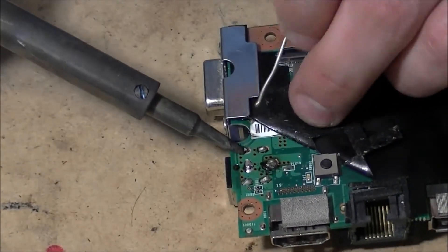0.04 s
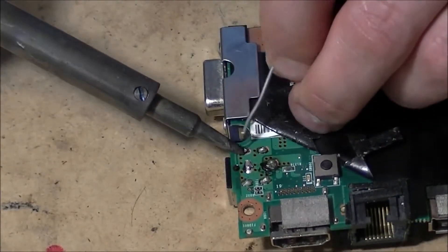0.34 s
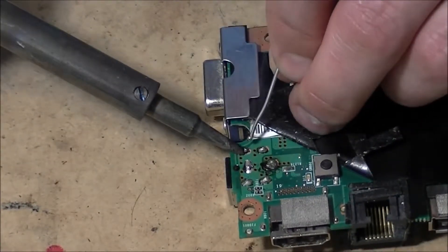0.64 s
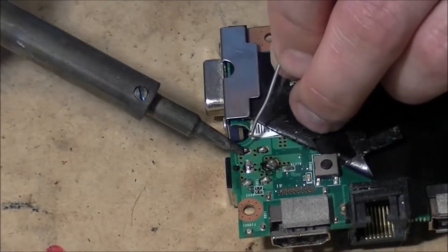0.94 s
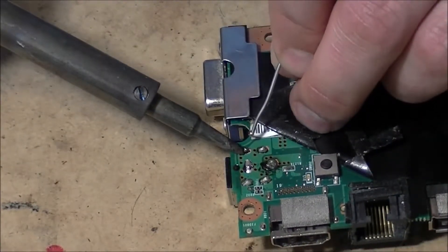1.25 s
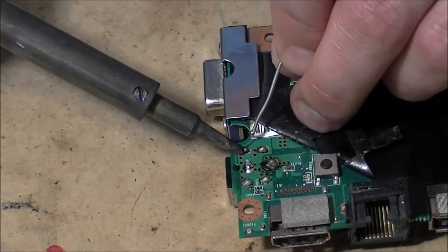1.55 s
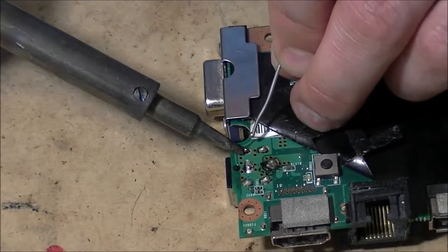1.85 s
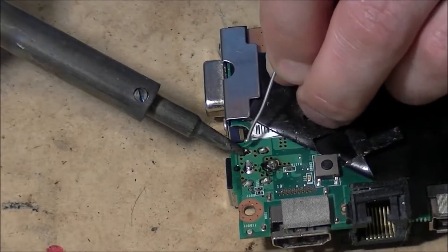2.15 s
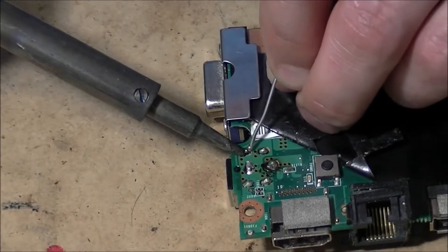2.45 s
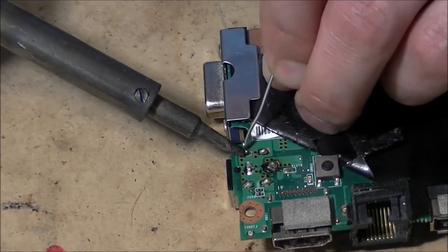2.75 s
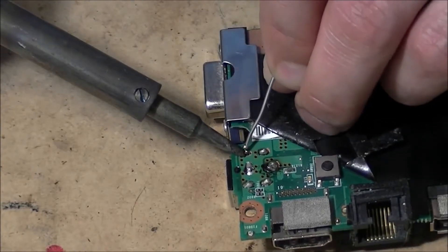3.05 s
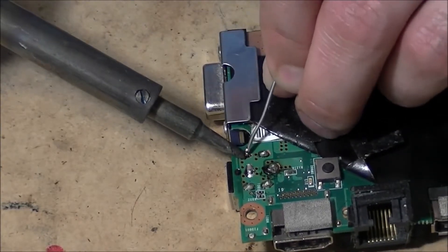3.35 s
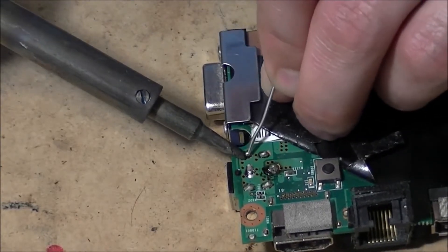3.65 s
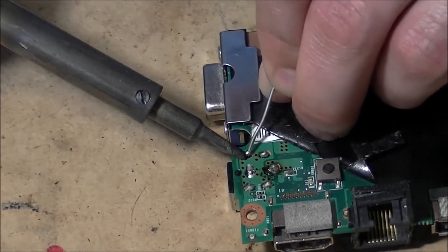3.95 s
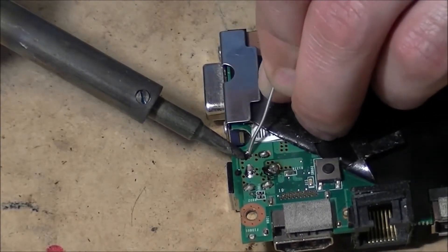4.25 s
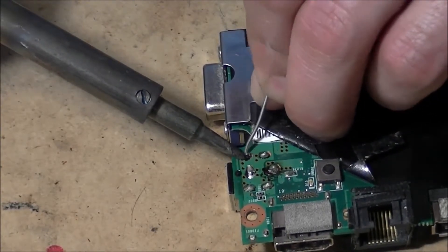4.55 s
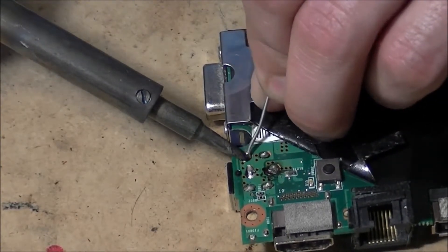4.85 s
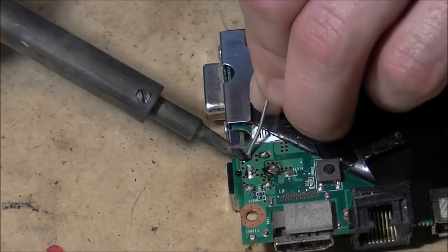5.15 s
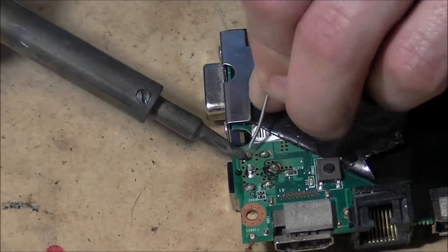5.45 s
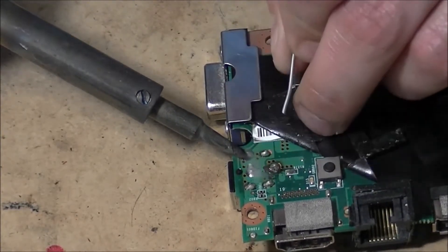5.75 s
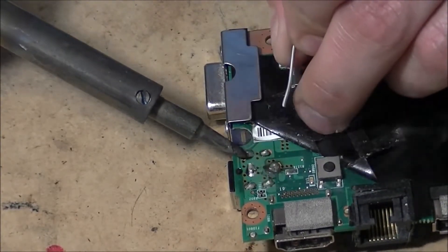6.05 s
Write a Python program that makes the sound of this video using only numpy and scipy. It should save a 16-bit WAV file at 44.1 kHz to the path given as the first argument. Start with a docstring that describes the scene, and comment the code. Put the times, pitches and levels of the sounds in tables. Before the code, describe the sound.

Soldering close up in a quiet room: sparse taps on a circuit board, tiny wire ticks and a faint hum.

```python
"""Soldering at a workbench

Impacts of iron and hand excite the modes of a circuit board, close to a stereo camera in a small room.
Solder wire ticks on the joint, flux crackles, the iron rings once, and soft pushes thud in the bench;
friction gives finger rubs and faint squeaks. Beneath lie steady hiss, mains hum, and the whine and
regular double tick of the camera's disk drive."""
import sys
import numpy as np
from scipy import signal
from scipy.fft import rfft, irfft
from scipy.io import wavfile
from scipy.ndimage import uniform_filter1d

SR = 44100
rng = np.random.default_rng(int(sys.argv[2]) if len(sys.argv) > 2 else 0)


def store_pcm(level_fs):
    """Save levels as 16-bit WAV."""
    pcm = np.round(np.clip(level_fs, -1, 1) * 32767).astype(np.int16)
    wavfile.write(sys.argv[1], SR, np.atleast_2d(pcm).T)


N = 268745
TIME = np.arange(N) / SR

# Spectral density of the hiss: f/Hz, relative level/dB
HISS_SPECTRUM = [(25, -23), (60, -15.5), (130, -9), (240, -3), (330, -6), (700, -4.5), (1100, -1.5),
                 (1600, -8.5), (2900, -11), (6000, -17.5), (9500, -20.5), (12000, -24.5), (13500, -29.5)]
# Stereo width of the hiss: f/Hz, side minus mid/dB
HISS_WIDTH = [(60, -2), (110, -9), (200, 2.5), (380, 10), (700, 8.5), (1290, 4), (2380, 4.5), (4400, 3),
              (8120, 1), (15000, 0.5)]
# Balance of the hiss: f/Hz, left minus right/dB
HISS_PAN = [(60, 10.5), (200, 4.5), (400, 1.5), (2400, 0), (15000, 0.5)]
# Harmonics of the mains: harmonic number, level/dB
MAINS_HARMONICS = [(2, -83), (4, -80), (8, -81.5), (20, -81.5)]
# Harmonics of the drive's spindle: harmonic number, level/dB
SPINDLE_HARMONICS = [(11, -84.5), (12, -93.5), (24, -76), (30, -88), (36, -75), (37, -91), (45, -85),
                     (54, -83), (55, -104), (60, -87.5)]
# Spectrum of the reverberant tail: f/Hz, gain/dB
TAIL_SPECTRUM = [(150, -25), (600, -5), (950, 3.5), (1300, 4.5), (1700, 0), (2200, -4), (3100, -3.5),
                 (3700, -5.5), (4600, -3.5), (7000, -2), (11000, -4), (15000, -12)]
# Reverberation time of the room: f/Hz, T60/s
REVERB_TIMES = [(200, 0.2), (1300, 0.41), (3000, 0.41), (8000, 0.39), (14000, .29)]
# Squeaks at the hot joint: t/s, level/dB, 1/e half-length/s
JOINT_SQUEAKS = [(0.887, -62.5, 0.0083), (1.214, -64, .008), (1.28, -63, .008), (6.026, -62.5, 0.018),
                 (6.075, -66.5, .013)]
# Finger strokes on wire and board: midpoint t/s, 1/e half-length/s, level/dB, f/Hz, filter bandwidth/Hz
FINGER_RUBS = [(.09, 0.074, -57, 1460, 1830), (0.12, 0.13, -67, 196, 87), (4.655, 0.1, -69.5, 9150, 5000),
               (4.715, 0.083, -66.5, 1790, 2000)]
# Modes of the bench: f/Hz, decay time/s, gain/dB
BENCH_MODES = [(146, .02, -25.5), (238, .02, -20), (366, .012, -1.5), (507, 0.0068, 2), (614, 0.014, -10.5)]
# Soft pushes on the bench: t/s, level/dB, spectral tilt/(dB per octave)
BENCH_BUMPS = [(0.021, -53.5, 10), (0.216, -55, 6), (2.34, -55, 8), (2.438, -54, 5), (3.45, -56.5, -5),
               (4.687, -56, -13), (5.565, -46, -7), (5.676, -54, 8), (5.713, -51.5, 2)]
# Modes of the iron: f/Hz, bandwidth/Hz, gain/dB
IRON_MODES = [(890, 45, 19), (1130, 55, 20), (2290, 330, 11), (2970, 160, 7), (4370, 170, 9),
              (8000, 520, -3)]
# Slip of the iron's tip on the pad: t/s, level/dB
IRON_SLIP = (1.6443, -28)
# Ticks of the solder wire: t/s, level/dB, f/Hz, decay time/s
WIRE_TICKS = [(0.099, -44, 9900, 0.0045), (2.2152, -42.5, 11000, 0.0029), (2.338, -42, 10300, 0.0022),
              (2.847, -29, 11300, 0.00093), (3.2112, -44, 9300, .0008), (3.286, -21.5, 11500, 0.00093),
              (4.3733, -42.5, 11900, 0.00097), (4.4633, -42, 12200, .0012), (4.6042, -36.5, 12600, .0007),
              (4.666, -48, 9650, .006), (5.6, -45.5, 10500, 0.0009)]
# Modes of the board and its metal sockets: f/Hz, bandwidth/Hz, gain/dB
BOARD_MODES = [(880, 310, 8.5), (1060, 25, 14.5), (1292, 45, 7.5), (1376, 13, 4), (1871, 65, 13.5),
               (2125, 27, 8.5), (2190, 89, 12), (2550, 32.5, 6), (2730, 43, 2.5), (3250, 310, 4),
               (2980, 17, -4), (4350, 160, 3.5), (5070, 320, 6.5), (6150, 280, 7.5), (7240, 280, 7.5),
               (8600, 750, 6), (11430, 1100, 4.5)]
# Spectrum of a contact with the board: f/Hz, gain/dB
CONTACT_SPECTRUM = [(100, -31), (350, -10.5), (700, -8.5), (1300, 9), (3000, 7.5), (5200, 3.5), (7000, 0.5),
                    (12000, 1.5), (15000, -9)]
# Knocks on the board: t/s, level/dB, weight (1.1 kHz)/dB, ring (2.3 kHz)/dB, edge (6.5 kHz)/dB,
# treble (9.5 kHz)/dB, room send/dB, left minus right/dB
BOARD_KNOCKS = [(0.3254, -4, -11, -1, -10.5, -6.5, -1, -2.5), (0.3792, -21.5, -1.5, 6.5, 0, -2.5, 3.5, 2),
                (3.6700, -40.5, 2, 0.5, -9, -4.5, 3.5, -1), (4.017, -11, 1.5, -3.5, -0.5, -5, -0.5, -1.5),
                (5.716, -53, 7, 1, -6, 4, -2, 2), (5.7458, -30, -3, 0.5, 6, 2, -1.5, -1.5)]


def undb(db):
    """Amplitude ratio of a level in decibels."""
    return 10 ** (np.asarray(db) / 20)


def unit(x):
    """Normalisation to unit rms."""
    return x / np.sqrt(np.mean(x ** 2))


def along(points, hz):
    """Interpolation of (f/Hz, value) points on a logarithmic frequency axis."""
    f, value = np.transpose(points)
    return np.interp(np.log(np.maximum(hz, 1)), np.log(f), value)


def colour(x, points):
    """Minimum-phase filtering through (f/Hz, gain/dB) points, by folding the cepstrum."""
    size = 4096
    gain = undb(along(points, np.fft.rfftfreq(size, 1 / SR)))
    cepstrum = irfft(np.log(gain))
    cepstrum[1:size // 2] *= 2
    cepstrum[size // 2 + 1:] = 0
    response = irfft(np.exp(rfft(cepstrum)))
    return signal.fftconvolve(x, response[None], axes=-1)[:, :x.shape[-1]]


def resonate(x, hz, width_hz):
    """Second-order resonance with unit gain at its centre."""
    return signal.lfilter(*signal.iirpeak(min(hz, .45 * SR), hz / width_hz, fs=SR), x)


def band(x, hz, width_hz):
    """Two equal resonances in cascade: a passband with steeper skirts."""
    return resonate(resonate(x, hz, width_hz), hz, width_hz)


def add(out, s, sound):
    """Superposition of a sound onto out, starting at s seconds."""
    start = int(s * SR)
    out[:, start:start + sound.shape[-1]] += sound[:, :N - start]


def pan(db):
    """Channel gains for a level difference, left minus right."""
    return undb(np.array([[db], [-db]]) / 2)


def stereo_noise(size, apart):
    """Partially coherent noise; apart is the amplitude ratio of side to mid."""
    mid, side = rng.standard_normal((2, size))
    return np.array([mid + apart * side, mid - apart * side]) / np.hypot(1, apart)


def wander(size):
    """Random fluctuation of unit rms: a moving average of noise over size samples."""
    return unit(uniform_filter1d(rng.standard_normal(N), size))


def waver(db, size):
    """Log-normal amplitude modulation: a gain of unit rms whose level deviates by db."""
    return unit(undb(db * wander(size)))


def hiss(db, top_hz=13650):
    """Stationary noise of room air and microphone; a strong side signal widens its middle range."""
    mid, side = colour(rng.standard_normal((2, N)), HISS_SPECTRUM)
    side = colour(side[None], HISS_WIDTH)[0]
    left = colour((mid + side)[None], [(hz, pan_db / 2) for hz, pan_db in HISS_PAN])
    right = colour((mid - side)[None], [(hz, -pan_db / 2) for hz, pan_db in HISS_PAN])
    air = undb(db) * np.vstack([left, right]) / mid.std()
    return signal.sosfilt(signal.ellip(8, .2, 60, top_hz, fs=SR, output="sos"), air)


def hum(mains_hz, spindle_hz):
    """Periodic sources give harmonic series: the mains hums and the drive's spindle whines."""
    out = 0
    for base_hz, harmonics in [(mains_hz, MAINS_HARMONICS), (spindle_hz, SPINDLE_HARMONICS)]:
        for number, db in harmonics:
            phase = rng.uniform(0, 2 * np.pi) + np.array([[0], [1.2]])
            out = out + undb(db) * np.sqrt(2) * np.sin(2 * np.pi * number * base_hz * TIME + phase)
    return out


def whistles():
    """Narrow-band noise is heard as pitch: two thin, wavering whistles."""
    out = 0
    for hz, width_hz, db in [(7580, 15, -84), (12360, 45, -87)]:
        whistle = unit(resonate(stereo_noise(N, apart=0.78), hz, width_hz))
        out = out + undb(db) * whistle * waver(db=1.5, size=SR // 4)
    return out


def flutter(db, hz=3850, pulse_hz=30, until_s=1.55):
    """Amplitude modulation makes a faint high tone flutter at the start."""
    pulses = np.maximum(np.cos(2 * np.pi * pulse_hz * TIME), 0) ** 2 * (TIME < until_s)
    return undb(db) * np.sin(2 * np.pi * hz * TIME) * pulses * waver(db=4, size=SR // 40)


def drive_seeks(first_s=.0425, period_s=.4672, return_s=.068, rise_s=.00094, decay_s=.0075):
    """Transient excitation: the head darts out and back, ringing its arm; the return rings the case."""
    dart, back = np.zeros((2, 2, N))
    t = TIME[:SR // 10]
    envelope = (1 - np.exp(-t / rise_s)) * np.exp(-t / decay_s)
    for s in np.arange(first_s, TIME[-1] - return_s, period_s):
        for stroke, late_s, db in [(dart, 0, -50), (back, return_s, -52)]:
            gain = undb(db - 0.6 * rng.standard_normal())
            add(stroke, s + late_s, gain * stereo_noise(len(t), apart=0.8) * envelope)
    both = dart + back
    arm = 3.5 * band(both, 1200, 1100) + 0.82 * resonate(both, 2400, 280) + 0.083 * both
    case = undb(12) * resonate(back, hz=594, width_hz=170)
    return arm + case


def room(x, tail_db, early_db):
    """Reverberation: early reflections off bench and tools, then a tail longest in the middle range."""
    t = TIME[:SR * 3 // 4]
    hz, s, bands = signal.stft(stereo_noise(len(t), apart=1), SR, nperseg=256)
    decay = np.exp(-np.log(1000) * s / along(REVERB_TIMES, hz)[:, None])
    diffuse = signal.istft(bands * decay, SR)[1][:, :len(t)]
    onset = np.clip(t / 0.0049 - .5, 0, 1)
    tail = colour(diffuse, TAIL_SPECTRUM) * onset
    early = stereo_noise(len(t), apart=1) * np.exp(-t / 0.011) * (t > 1 / 400)
    response = undb(tail_db) * tail + undb(early_db) * early
    return signal.fftconvolve(x.mean(axis=0)[None], response, axes=-1)[:, :N]


def path_difference(x, lag_s):
    """Sound from a little to one side travels farther to the right microphone port and arrives later."""
    delay = np.exp(-2j * np.pi * np.fft.rfftfreq(N, 1 / SR) * lag_s)
    return np.array([x[0], irfft(rfft(x[1]) * delay, N)])


def squeaks(start_hz=2900, rise_hz_per_s=14, roughness=0.012):
    """Stick-slip friction gives short, raspy chirps on one pitch that creeps upward."""
    hz = (start_hz + rise_hz_per_s * TIME) * (1 + roughness * wander(SR // 1500))
    catches = waver(db=5, size=SR // 500)
    tone = np.sin(2 * np.pi * np.cumsum(hz) / SR)
    envelope = sum(undb(db) * np.exp(-((TIME - s) / half_s) ** 2) for s, db, half_s in JOINT_SQUEAKS)
    return tone * catches * envelope


def rubs():
    """Friction noise: skin drags in small catches, swelling and fading with each stroke."""
    out = 0
    for s, half_s, db, hz, width_hz in FINGER_RUBS:
        catches = waver(db=3.4, size=SR // 200)
        drag = band(stereo_noise(N, apart=0.75) * catches, hz, width_hz)
        out = out + undb(db) * unit(drag) * np.exp(-((TIME - s) / half_s) ** 2)
    return out


def bumps(pivot_hz=430, rise_s=0.00099):
    """Damped free vibration of the bench after a padded push; a softer one favours the low modes."""
    out, t = np.zeros((2, N)), TIME[:SR // 5]
    onset = (1 - np.exp(-t / rise_s)) ** 2
    for s, db, tilt_db in BENCH_BUMPS:
        ring = 0
        for hz, decay_s, mode_db in BENCH_MODES:
            gain = undb(mode_db + tilt_db * np.log2(hz / pivot_hz))
            ring = ring + gain * np.sin(2 * np.pi * hz * t) * np.exp(-t / decay_s)
        add(out, s, undb(db) * ring * onset * pan(3.8))
    return out


def iron():
    """Impulse response of the iron: its tip slips once on the pad and the barrel rings."""
    out, click = np.zeros((2, N)), signal.unit_impulse(SR // 5)
    s, db = IRON_SLIP
    ring = sum(undb(mode_db) * resonate(click, hz, width_hz) for hz, width_hz, mode_db in IRON_MODES)
    add(out, s, undb(db) * ring * pan(6.2))
    return out


def tick(db, hz, decay_s):
    """A brief burst has a broad spectrum: it excites a bright band and three lower resonances."""
    t = TIME[:SR // 10]
    burst = stereo_noise(len(t), apart=0.18) * np.exp(-t / decay_s)
    bright = band(burst, hz, width_hz=3128) * np.sqrt(hz / 2300)
    body = sum(gain * resonate(burst, mode_hz, width_hz)
               for mode_hz, width_hz, gain in [(3800, 570, .41), (7100, 620, .55), (2100, 830, .13)])
    return undb(db) * (0.44 * bright * pan(3.4) + body)


def flux(from_s, until_s, count):
    """A random point process: flux crackles faintly while the wire feeds the joint."""
    out = np.zeros((2, N))
    for s in rng.uniform(from_s, until_s, size=count):
        add(out, s, tick(db=-48 + rng.standard_normal(), hz=10200, decay_s=0.0014))
    return out


def wire():
    """Each sudden slip of the thin wire on the joint radiates a transient."""
    out = np.zeros((2, N))
    for s, db, hz, decay_s in WIRE_TICKS:
        add(out, s, tick(db, hz, decay_s))
    return out


def knock(weight_db, ring_db, edge_db, treble_db, pan_db, cutoff_hz=527):
    """Modal response of the board to an impact and brief rattle: close by, and spread over the room."""
    t = TIME[:SR // 5]
    click = np.zeros((2, len(t)))
    click[:, 0] = -1.61
    rattle = .09 * stereo_noise(len(t), apart=1) * np.exp(-t / .004)
    ring = sum(undb(db) * resonate(click + rattle / 2, hz, width_hz) for hz, width_hz, db in BOARD_MODES)
    near = (0.57 * click + rattle + ring) * pan(pan_db)
    spread = 1.43 * click + 0.26 * ring  # summed over all directions, the spectrum is more even
    # The place and force of the strike set the balance of the modes.
    strike = [(550, weight_db + 8.5), (1100, weight_db), (2300, ring_db),
              (4900, -2), (6500, edge_db), (9500, treble_db)]
    # A small board radiates low frequencies poorly.
    radiation = signal.butter(4, cutoff_hz, "high", fs=SR, output="sos")
    return [signal.sosfilt(radiation, colour(colour(x, CONTACT_SPECTRUM), strike))
            for x in (near, spread)]


def board():
    """Radiation from the knocked board: the direct sound, and the share that excites the room."""
    direct, send = np.zeros((2, 2, N))
    for s, db, weight_db, ring_db, edge_db, treble_db, room_db, pan_db in BOARD_KNOCKS:
        near, spread = knock(weight_db, ring_db, edge_db, treble_db, pan_db)
        add(direct, s, near * undb(db))
        add(send, s, spread * undb(db + room_db))
    return direct, send


def scene():
    """Superposition of the direct field, the reverberant field and the steady background."""
    knocks, send = board()
    ticks = wire() + flux(from_s=2.7, until_s=5.7, count=16)
    handling = iron() + bumps() + rubs() + squeaks()
    direct = path_difference(knocks + ticks + handling, lag_s=14e-6)
    reverberant = room(send + .35 * ticks + .45 * handling, tail_db=-31.5, early_db=-27)
    background = drive_seeks() + hiss(db=-65)
    tones = hum(mains_hz=60, spindle_hz=70) + whistles() + flutter(db=-69)
    return direct + reverberant + background + tones


def record(dry):
    """Band limiting: the camera cuts off steeply above 14.7 kHz."""
    return signal.sosfilt(signal.ellip(8, .2, 70, 14700, fs=SR, output="sos"), dry)


dry = scene()
out = record(dry)
store_pcm(out)
```